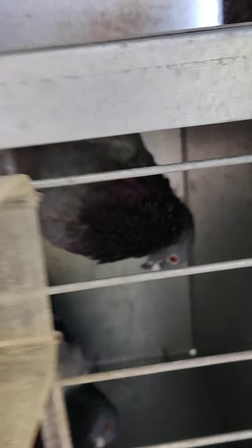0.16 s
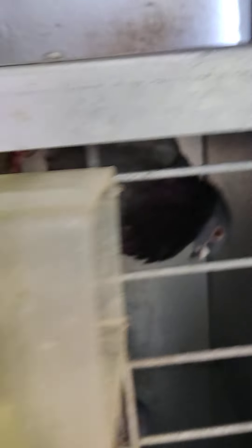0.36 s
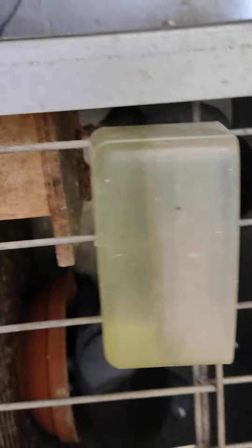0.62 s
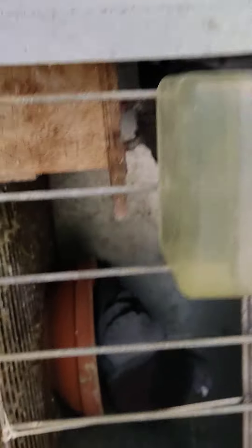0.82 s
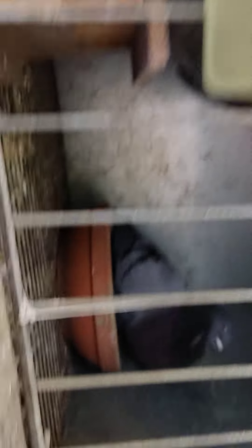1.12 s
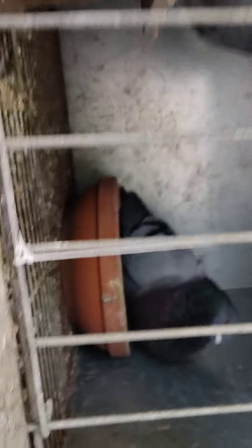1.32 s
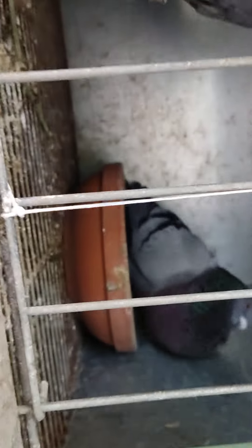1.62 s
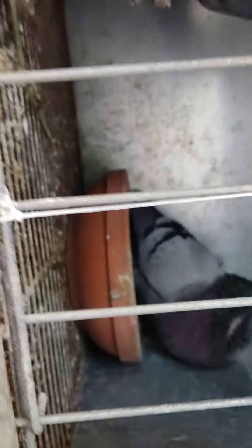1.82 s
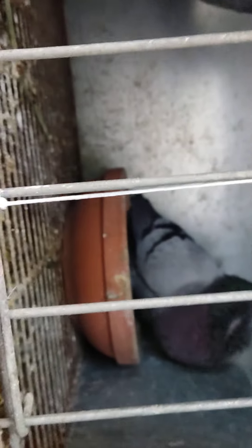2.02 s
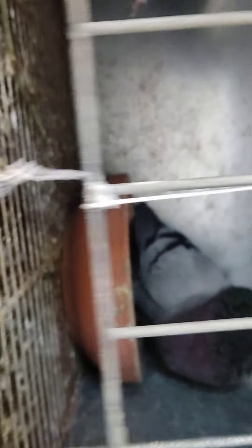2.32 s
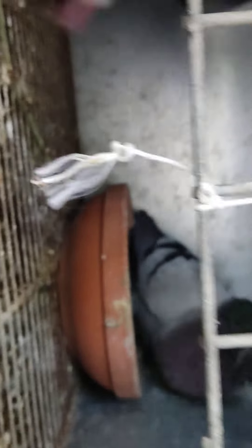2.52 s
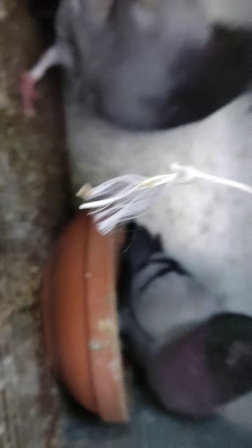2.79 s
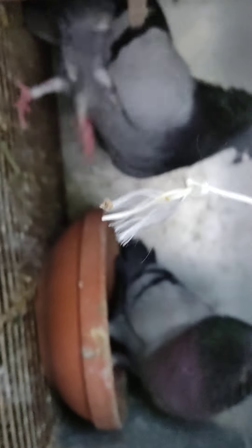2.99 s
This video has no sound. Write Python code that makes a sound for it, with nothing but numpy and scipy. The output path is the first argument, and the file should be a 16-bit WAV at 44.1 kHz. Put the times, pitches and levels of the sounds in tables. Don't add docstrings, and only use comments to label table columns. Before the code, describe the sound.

Pigeons coo softly in a wooden loft, then claws rattle and scrabble on wire mesh

```python
import sys
import numpy as np
from scipy import signal
from scipy.fft import rfft, irfft
from scipy.io import wavfile
from scipy.ndimage import uniform_filter1d

SR = 44100
rng = np.random.default_rng(int(sys.argv[2]) if len(sys.argv) > 2 else 0)


def to_wav(sig):
    pcm = np.clip(np.atleast_2d(sig), -1, 1) * 32767
    pcm = np.round(pcm).astype(np.int16)
    wavfile.write(sys.argv[1], SR, pcm.T)


def elevation(decibels):
    levels = np.asarray(decibels, float)
    return 10 ** (levels / 20)


N = 138915
T = np.arange(N) / SR


def curve(table):
    return np.interp(T, *np.array(table, float).T)


def shape(x, points, scale=0.9, beyond_db=-90.):
    p = np.array(points, float)
    hz = np.arange(N // 2 + 1) * SR / N + 1e-3
    gain_db = np.interp(np.log(hz), np.log(p[:, 0]), p[:, 1], beyond_db, beyond_db)
    return irfft(rfft(x) * elevation(scale * gain_db), N)


def colour(x, points):
    y = shape(x, points)
    return y / y.std()


def ring(x, hz, width_hz):
    return signal.lfilter(*signal.iirpeak(hz, hz / width_hz, SR), x)


def walk(rate_hz, count=N):
    k = int(SR / rate_hz)
    steps = np.repeat(rng.standard_normal(count // k + 2), k)[:count]
    w = uniform_filter1d(uniform_filter1d(steps, k), k)
    return (w - w.mean()) / w.std()


def pair(alike, grain_db=0.):
    shared, left, right = rng.standard_normal((3, N))
    a = np.clip(alike, 0, 1)
    common = np.array([shared, np.roll(shared, 9)])
    noise = np.sqrt(a) * common + np.sqrt(1 - a) * np.array([left, right])
    return noise * elevation(grain_db * walk(600))


def pan(side_db):
    return elevation(np.array([[side_db / 2], [-side_db / 2]]))


def patchy(x, flicker_db, rate_hz):
    out = 0
    for hz in np.geomspace(400, 13000, num=9):
        band = [(hz / 1.5, -30), (hz / 1.15, 0), (hz * 1.15, 0), (hz * 1.5, -30)]
        out = out + shape(x, band) * elevation(flicker_db * walk(rate_hz))
    return out


def loft():
    # (frequency [Hz], density [dB per Hz])
    hiss_spectrum = [(350, -34), (600, -13), (1200, -4.5), (2650, -1), (3690, 3.5), (6540, -6.5),
                     (11000, -3.5), (14300, -12)]
    # (time [s], level [dB])
    cheeping = [
        (0, -69),
        (.6, -51.5),
        (1.15, -54.5),
        (1.35, -59),
        (3.15, -62),
    ]
    # (frequency [Hz], density [dB per Hz])
    rumble_spectrum = [(10, 0.5), (30, -7), (100, -12), (250, -21), (600, -13)]
    # (time [s], rumble gain [dB])
    handling = [
        (0, -2.5),
        (1.3, 6.5),
        (2.2, 1),
        (2.78, 9),
        (2.9, 13),
        (3.0, 8.5),
        (3.15, 12.5),
    ]
    hiss_db, rumble_db = -52.5, -50.5
    hiss = patchy(colour(pair(0.033), hiss_spectrum), 2, 12.62) * elevation(hiss_db)
    cheep = ring(ring(pair(0.22), 3500, 1700), 3500, 1700)
    cheep = cheep / cheep.std() * elevation(curve(cheeping) + 0.83 * walk(11.7))
    mid, side = rng.standard_normal((2, N))
    rumble = colour(np.array([mid + 0.4 * side, mid - 0.24 * side]), rumble_spectrum)
    return hiss + cheep + rumble * elevation(rumble_db + curve(handling) + 2 * walk(4.56))


def add(out, t0, length_s, hz0, hz1, db, wobble, throb_db, octave_db):
    attack_s, release_s, spread_db = .025, .025, 1.2
    i, n = int(t0 * SR), int(length_s * SR)
    t, size = np.arange(n) / SR, max(n, SR // 8)
    env = np.clip(t / attack_s, 0, 1) * np.clip((length_s - t) / release_s, 0, 1)
    drift, throb = walk(60, count=size)[:n], walk(70, count=size)[:n]
    side, lag = rng.standard_normal(2)
    hz = np.linspace(hz0, hz1, n) * (1 + wobble * (drift - drift.mean()))
    phase = 2 * np.pi * np.cumsum(hz) / SR + 0.56 * lag * np.array([[1], [-1]])
    tone = np.sin(phase) + elevation(octave_db) * np.sin(2 * phase)
    level = np.sqrt(2) * elevation(db + throb_db * (throb - throb.mean()))
    x = level * env * tone * pan(spread_db * side)
    out[:, i:i + n] += x[:, :N - i]


def pigeons():
    # (start [s], length [s], first pitch [Hz], last pitch [Hz], level
    # [dB])
    coos = [(0, .34, 282, 292, -40), (.36, .14, 281, 281, -38), (.53, .17, 290, 279, -43),
            (.52, .18, 388, 365, -37), (.24, .1, 525, 400, -49), (.57, .07, 466, 466, -47),
            (.69, .08, 440, 450, -48), (.76, .14, 412, 392, -45), (.9, .25, 401, 408, -39),
            (.99, .08, 445, 430, -44), (.7, .06, 265, 260, -48), (1.09, .16, 245, 250, -42),
            (1.14, .24, 265, 352, -36), (1.24, .1, 432, 433, -40), (1.3, .16, 257, 235, -39),
            (1.33, .1, 385, 400, -37), (1.29, .14, 512, 532, -43), (1.44, .09, 372, 350, -36),
            (1.5, .09, 335, 290, -38), (1.43, .07, 423, 420, -40), (.86, .14, 547, 547, -52),
            (1.04, .17, 570, 507, -49), (1.58, .17, 277, 250, -49),
            (2.03, .09, 298, 300, -40),
        (2.35, .19, 288, 322, -32),
        (2.16, .08, 290, 285, -44),
        (.02, .13, 575, 560, -55),
        (.05, .28, 140, 155, -55),
        (.44, .12, 420, 390, -47),
        (.96, .1, 235, 240, -49),
    ]
    # (time [s], level [dB])
    flock = [(0, -46.5), (.35, -47), (.6, -44.5), (.8, -52.5), (1.3, -34.5), (1.5, -39.5), (1.64, -50.5),
             (2.1, -43.5), (2.6, -43.5), (2.95, -39.5), (3.15, -42)]
    # (start [s], length [s], first pitch [Hz], last pitch [Hz], level [dB])
    squeaks = [(.16, .1, 3700, 3550, -55), (.22, .05, 3300, 3150, -60), (.41, .06, 4000, 4050, -57),
               (.43, .09, 4350, 4300, -60), (.36, .1, 3100, 3250, -60), (.49, .06, 3350, 3250, -60),
               (.71, .06, 4850, 4650, -58), (.76, .1, 3800, 4000, -61), (.89, .06, 2900, 2800, -57),
               (1.0, .07, 4100, 4450, -59), (1.03, .13, 3650, 3450, -52), (1.09, .06, 2950, 2900, -57)]
    near, far, young = np.zeros((3, 2, N))
    for note in coos:
        add(near, *note, wobble=.015, throb_db=2.5, octave_db=-24)
    for when, height in rng.random((500, 2)):
        hz = 190 * (620 / 190) ** height
        db = -7 * abs(np.log2(hz / 340))
        add(far, when * (T[-1] - .05), .07, hz, hz, db, .03, 4, -20)
    for note in squeaks:
        add(young, *note, wobble=.01, throb_db=3, octave_db=-40)
    murmur = np.roll(far, SR // 20, axis=1) / far.std() * elevation(curve(flock))
    breath = 0.65 + 0.68 * walk(500)
    return elevation(-0.3) * near + murmur + elevation(5.0) * young * breath


def box():
    # (frequency [Hz], width [Hz], level [dB])
    modes = [
        (138.8, 22, 4),
        (154.8, 20, 4.5),
        (684, 230, -13),
    ]
    # (time [s], level [dB])
    thumps = [(1.55, -51), (1.74, -42.5), (1.869, -36), (1.93, -48), (2.161, -31.5), (2.311, -31),
              (2.391, -34.5), (2.597, -33.5), (2.674, -23), (2.741, -37), (2.807, -26.5), (2.87, -33.5),
              (2.99, -37)]
    rise_s, t60_s, shuffle_db = 0.017, 0.43, -56.5
    mid, side = rng.standard_normal((2, N))
    noise = np.array([mid + 0.047 * side, mid - 0.29 * side])
    body = sum(elevation(db) * ring(ring(noise, hz, width_hz), hz, width_hz) for hz, width_hz, db in modes)
    env = elevation(shuffle_db)
    for t0, db in thumps:
        decay = elevation(db - 60 * np.maximum(T - t0, 0) / t60_s)
        env = env + decay * np.clip((T - t0) / rise_s, 0, 1)
    return body / body.std() * env


def knocks():
    # (time [s], peak [dB], pitch [Hz])
    hits = [(0.056, -40.5, 2460), (0.5352, -40, 2280), (0.9091, -36, 1615), (1.3673, -35.5, 2230),
            (1.5496, -33, 1940), (1.6532, -34.5, 1110), (1.7265, -33, 656), (1.8697, -18, 2080),
            (2.163, -19, 2010), (2.6727, -12.5, 2410), (2.7631, -16.5, 2274), (2.835, -14, 655),
            (2.89, -40, 710), (2.94, -42, 820), (3.0242, -22, 1750), (3.0266, -20, 800)]
    rise_s, crack_t60_s, tail_t60_s, tail_db = 0.0011, .028, 0.19, -9.5
    partials = [(1, 0.86), (1.22, 0.47), (0.9, 0.31)]
    side_phase = np.array([[0], [1.5]])
    out, tail = 0, colour(pair(0.13), [(400, -1), (700, -4.5), (2200, -2.5), (7000, -20)])
    for t0, db, hz in hits:
        d = np.maximum(T - t0, 0)
        crack = sum(g * np.sin(2 * np.pi * hz * ratio * d + side_phase) for ratio, g in partials)
        crack = crack * elevation(-60 * d / crack_t60_s)
        dull = elevation(tail_db - 60 * d / tail_t60_s) * tail
        out = out + elevation(db) * np.minimum(d / rise_s, 1) * (crack + dull)
    return out


def wings():
    # (centre [s], half width [s], level [dB])
    strokes = [(.35, 0.025, -57.5), (1.7, 0.18, -46.5), (2.0, 0.024, -84), (2.272, 0.039, -35),
               (2.325, 0.049, -32), (2.422, 0.12, -36), (2.483, 0.064, -44.5), (2.592, 0.12, -32.5),
               (2.779, 0.039, -35.5), (2.861, 0.11, -36), (3.038, 0.098, -44.5), (3.12, 0.041, -49)]
    # (frequency [Hz], density [dB per Hz])
    feather = [(250, -14), (500, -7), (900, -10), (2200, -12), (6400, -20), (11200, -12.5), (14300, -37),
               (14600, -63)]
    env = sum(elevation(db) * np.exp(-((T - t0) / half_s) ** 2) for t0, half_s, db in strokes)
    return env * patchy(colour(pair(.4, grain_db=3), feather), 4.5, 25)


def ticks():
    # (time [s], peak [dB], t60 [s], left minus right [dB])
    strikes = [(.569, -36.5, 0.26, 2), (.744, -35, .15, 6), (0.816, -32.5, 0.19, 0.5),
               (1.0026, -30, 0.27, 2), (1.26, -27, 0.17, 3), (1.345, -34, .4, 5), (1.5525, -23, 0.064, 5),
               (1.6504, -19.5, 0.073, 4), (1.7186, -19, 0.047, -8), (1.7255, -8.5, 0.036, 2.5),
               (1.8633, -3.5, 0.093, -0.5), (1.97, -28.5, 0.39, -1), (2.061, -24, 0.11, 4.5),
               (2.154, -11, 0.071, 0), (2.3122, -8.5, 0.095, 3), (2.376, -18, 0.028, -7),
               (2.409, -14.5, 0.093, 1), (2.4596, -5.5, 0.08, 0), (2.468, -16, 0.19, 8),
               (2.485, -26, 0.057, 0), (2.4968, -7, 0.037, -14), (2.508, -8, 0.044, 7.5),
               (2.5568, -7.5, 0.063, 1.5), (2.605, -16, 0.098, -9), (2.633, -12.5, 0.044, 4),
               (2.6702, 1, 0.012, -4.5), (2.6783, -2.5, 0.023, -2), (2.6983, -1, 0.021, -4.5),
               (2.7183, -10, 0.029, 11), (2.722, -10, 0.014, -2), (2.7349, -1.5, 0.011, 3.5),
               (2.745, -14, 0.018, 5), (2.756, -8, 0.024, 2), (2.76, -10.5, 0.062, 11.5),
               (2.7713, -9, 0.059, 6), (2.786, -20, 0.067, 7), (2.8385, -14.5, 0.081, 8),
               (2.979, -22, 0.059, -6), (3.0132, -13, .03, -8.5), (3.029, -20.5, .12, 2)]
    # (frequency [Hz], density [dB per Hz])
    mesh = [(350, -18), (600, -17.5), (1830, -11), (2620, -13), (3410, -8.5), (6450, -9), (8640, -2),
            (14300, -8)]
    rise_share = 0.041
    env = 0
    for t0, db, t60_s, side_db in strikes:
        d, t60_s = np.maximum(T - t0, 0), max(t60_s, .012)
        rise = np.minimum(d / (rise_share * t60_s), 1)
        env = env + elevation(db) * pan(side_db) * rise * elevation(-60 * d / t60_s)
    return elevation(-10.5) * env * colour(pair(0.18, grain_db=0.51), mesh)


def wires(x):
    # (frequency [Hz], width [Hz], level [dB])
    bars = [(3158, 37, 8.5)]
    return x + sum(elevation(db) * ring(x, hz, width_hz) for hz, width_hz, db in bars)


def scene():
    room_t60_s, birds_wet_db, cage_wet_db = .5, -10, -16
    background, birds, drumming = loft(), pigeons(), box()
    cage = knocks() + wires(wings() + ticks())
    t = T[:SR // 2]
    echo = rng.standard_normal((2, len(t))) * elevation(-60 * t / room_t60_s) * (t > .004)
    echo = echo / np.sqrt((echo ** 2).sum(1, keepdims=True))
    sent = elevation(birds_wet_db) * birds + elevation(cage_wet_db) * cage
    wet = signal.fftconvolve(sent, echo, axes=1)[:, :N]
    return birds + cage + wet + drumming + background


def roll_off(x):
    return signal.sosfilt(signal.butter(12, 15610, fs=SR, output="sos"), x)


def record(dry):
    # (frequency [Hz], width [Hz], level [dB])
    ports = [(8570, 660, 6.5), (10600, 620, 7.5)]
    # (frequency [Hz], level [dB])
    port_tilt = [(500, -2), (1400, 4.5), (4500, 2), (9000, -11.5), (12500, 19)]
    x = dry + sum((elevation(db) - 1) * ring(dry, hz, width_hz) for hz, width_hz, db in ports)
    x = shape(x, port_tilt, scale=np.array([[.5], [-.5]]), beyond_db=0.)
    return roll_off(np.clip(x, -1, 1))


dry = scene()
out = record(dry)
to_wav(out)
```